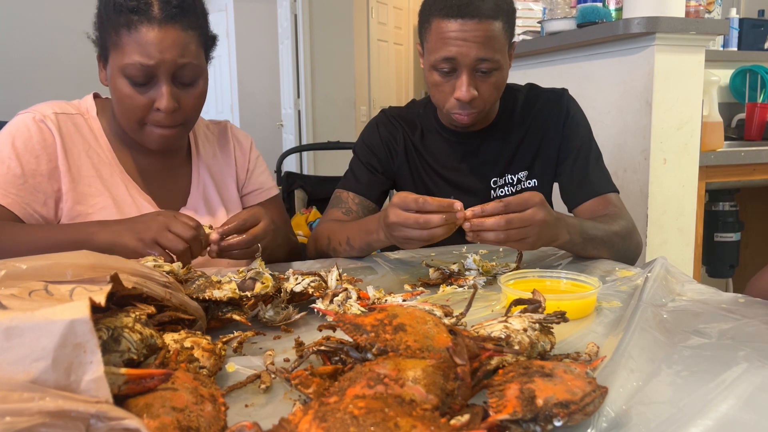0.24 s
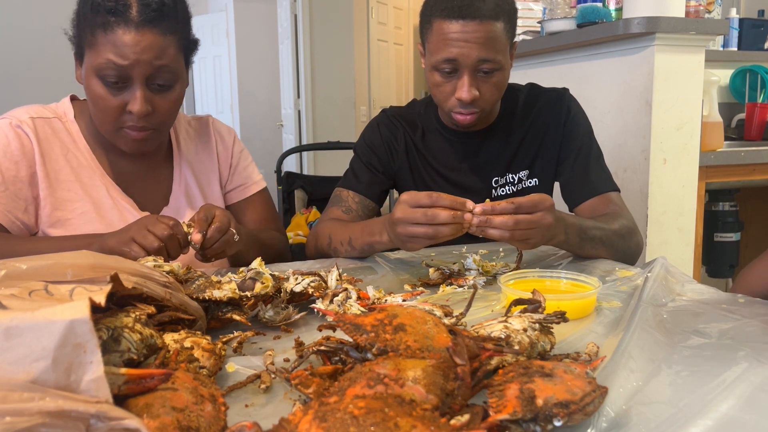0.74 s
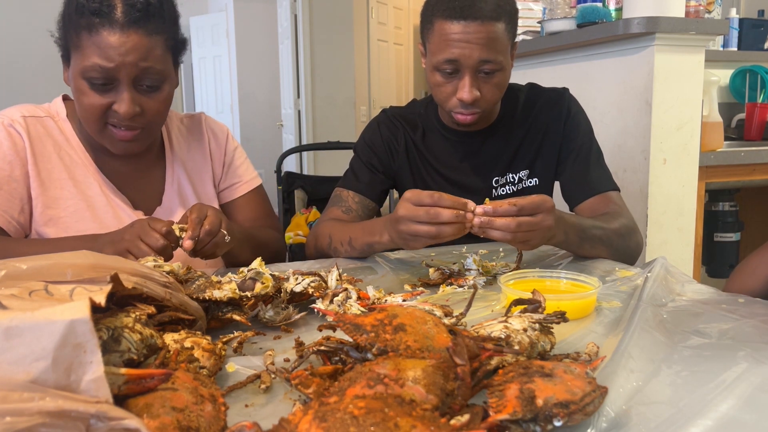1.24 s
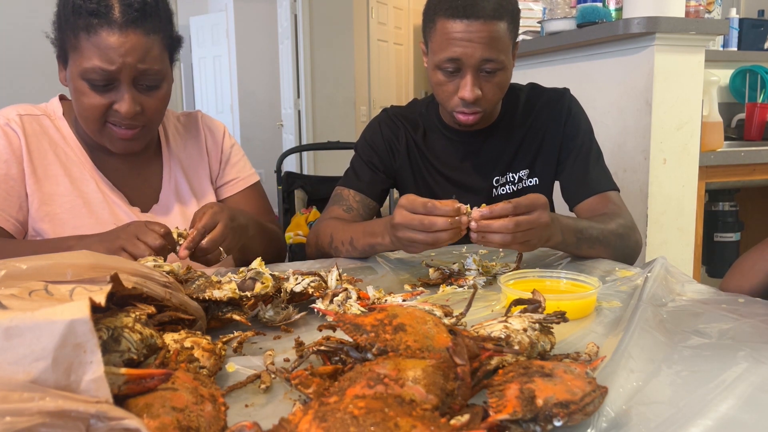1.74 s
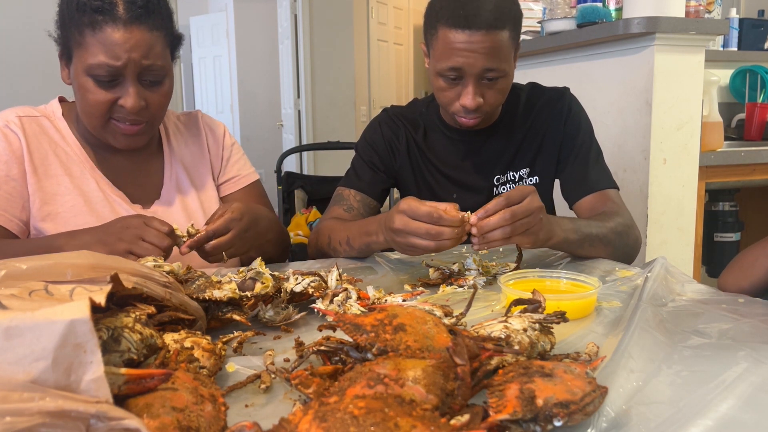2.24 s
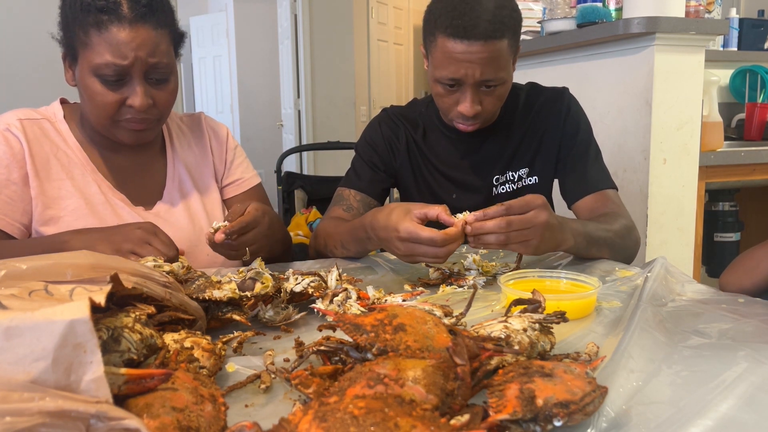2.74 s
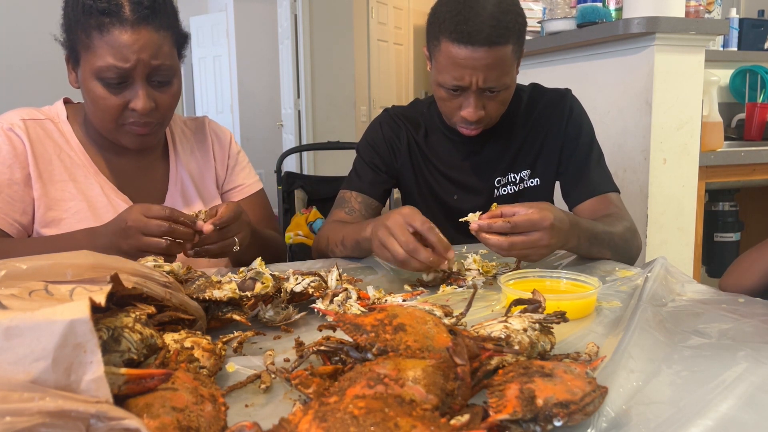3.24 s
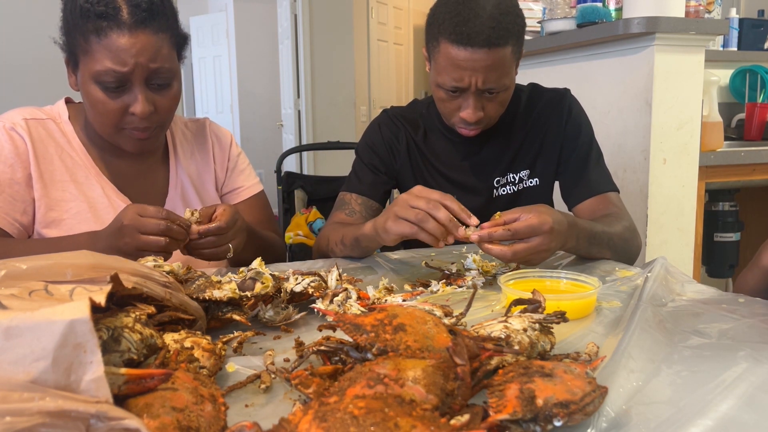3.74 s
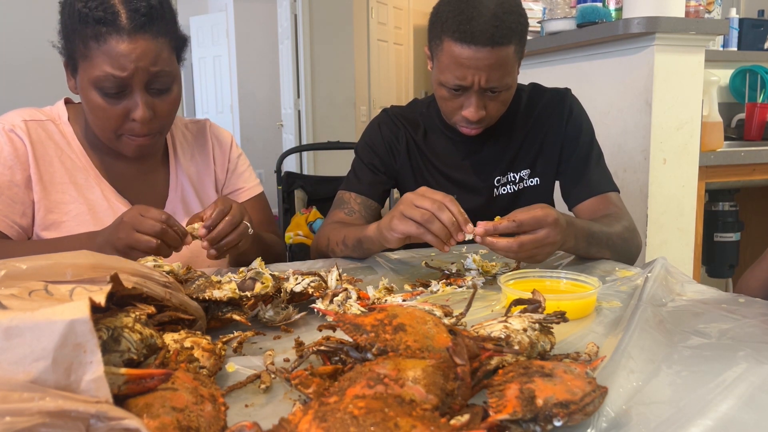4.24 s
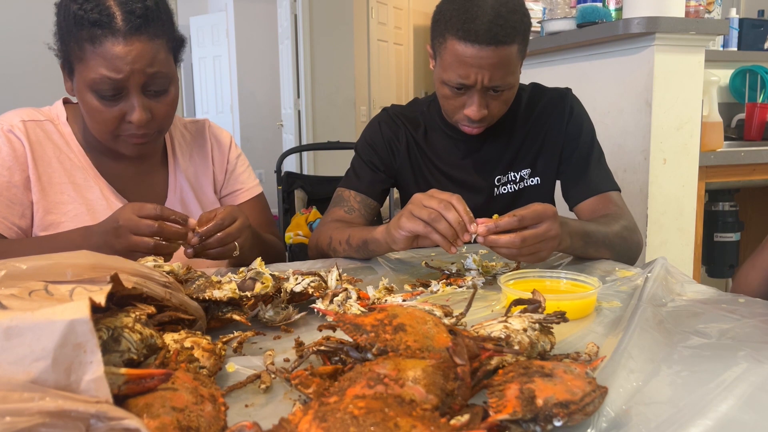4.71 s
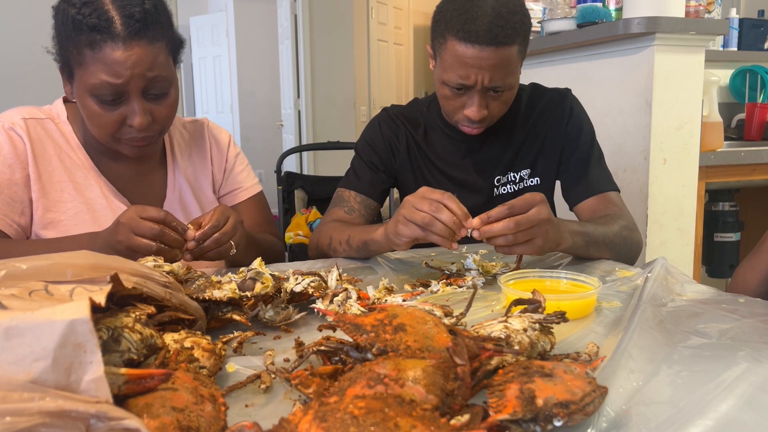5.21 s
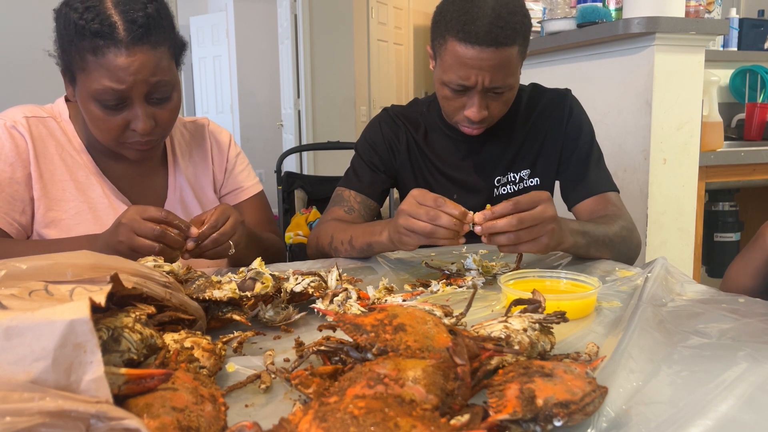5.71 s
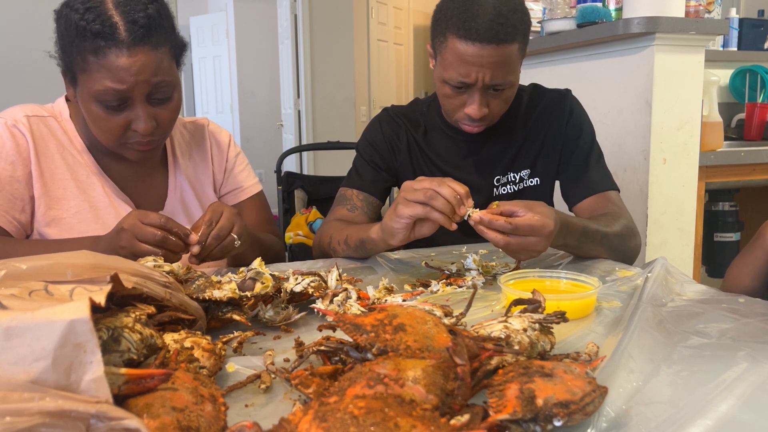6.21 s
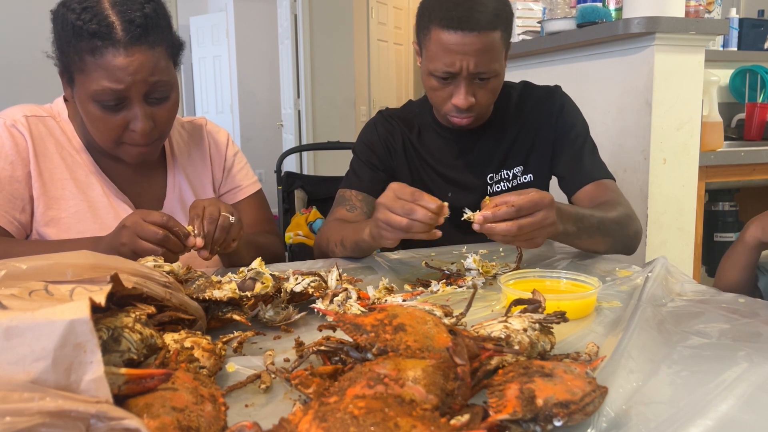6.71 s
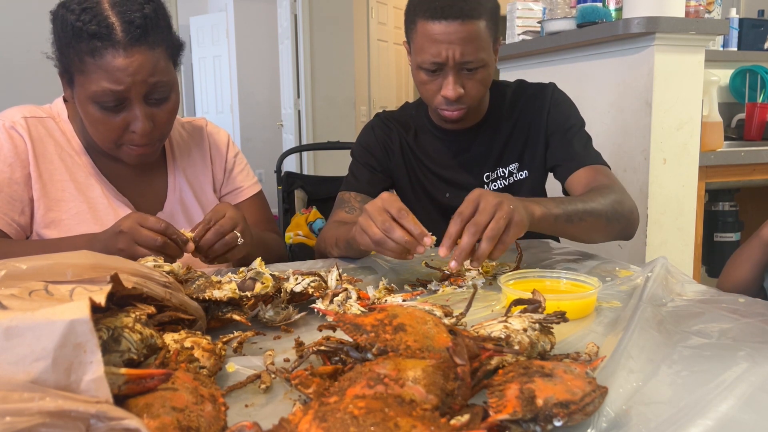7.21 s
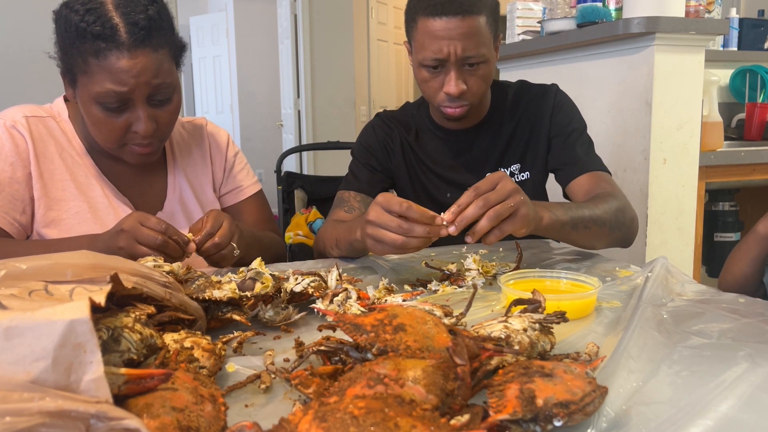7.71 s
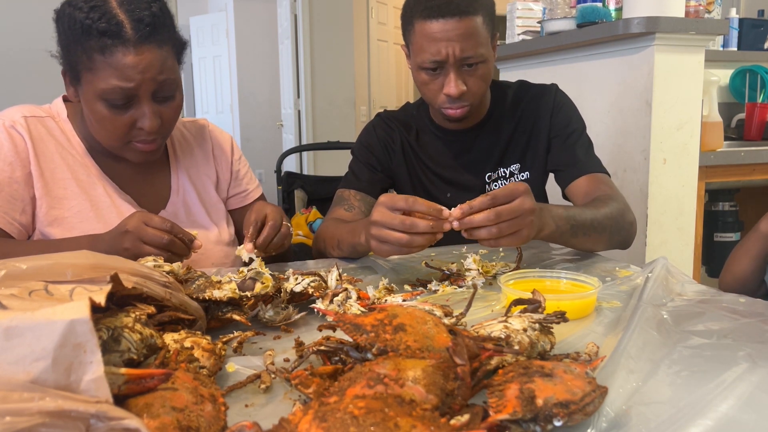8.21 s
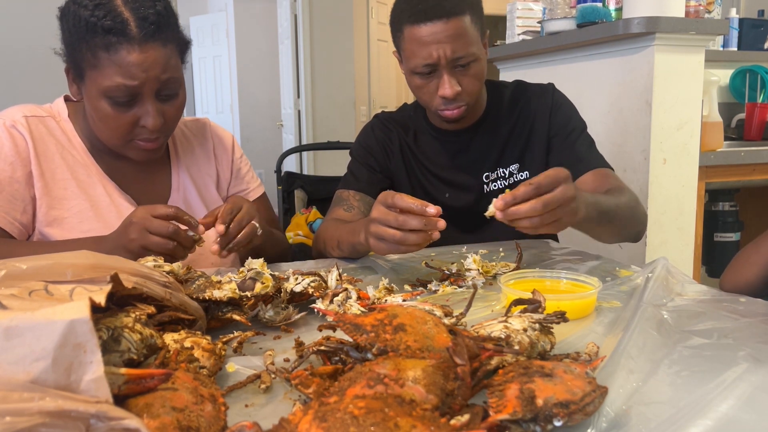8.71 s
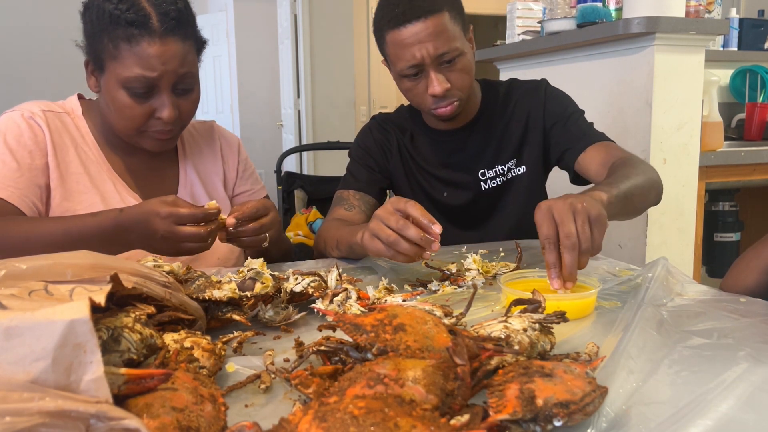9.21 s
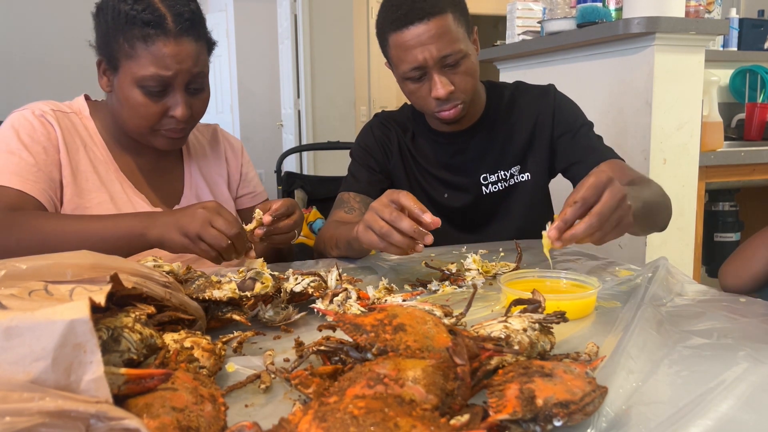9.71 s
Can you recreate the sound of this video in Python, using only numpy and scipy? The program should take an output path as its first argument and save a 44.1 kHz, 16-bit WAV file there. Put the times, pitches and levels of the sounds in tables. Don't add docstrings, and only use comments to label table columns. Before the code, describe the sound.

Crisp shell snaps and wet tearing fill the first seconds, then sparse tiny fingernail ticks and dropped scraps above a steady kitchen machine drone.

```python
import sys
import numpy as np
from scipy import signal
from scipy.fft import rfft, irfft, next_fast_len
from scipy.io import wavfile

SR = 44100
rng = np.random.default_rng(int(sys.argv[2]) if len(sys.argv) > 2 else 0)


def amplitude_ratio(level_db):
    exponent = np.asarray(level_db, float) / 20
    return 10 ** exponent


def pcm_store(signal):
    levels = np.round(np.clip(np.atleast_2d(signal), -1, 1) * 32767)
    wavfile.write(sys.argv[1], SR, levels.astype(np.int16).T)


N = 438794

# pitch_hz, left_lead_rad
LEAD = [(0, 0), (430, 0.7), (1030, -2.3), (1980, 7.0), (2410, 5.5), (4050, 5.9), (5250, 4.4), (6600, 3.0),
        (8270, 6.1), (9560, 6.3), (11800, 9.3), (13600, 9.4), (14700, 12.0), (16200, 12.9)]


def evened(x):
    return x / np.sqrt(np.mean(x ** 2) + 1e-20)


def read(points, hz):
    f, value = np.transpose(points)
    return np.interp(np.log(hz + 1), np.log(f + 1), value)


def add(mix, start_s, sound):
    part = mix[..., round(start_s * SR):][..., :sound.shape[-1]]
    part += sound[..., :part.shape[-1]]


def sides(pan_db):
    return amplitude_ratio(pan_db * np.array([[.5], [-.5]]))


def resonate(x, hz, width_hz):
    r = np.exp(-np.pi * width_hz / SR)
    return signal.lfilter([1, 0, -1], [1, -2 * r * np.cos(2 * np.pi * hz / SR), r * r], x)


def ring(hz, q, chance, t60_s):
    first_blow = 4.4
    fading = amplitude_ratio(-60 * np.arange(len(chance)) / SR / t60_s)
    x = np.r_[first_blow, chance[1:]] * fading
    for _ in range(2):
        x = resonate(x, hz, hz / q)
    return x / abs(x).max()


def splintering():
    t = np.arange(1800) / SR
    splinters_per_s = 710
    taps = (rng.random(len(t)) < splinters_per_s / SR) * rng.standard_normal(len(t))
    taps *= amplitude_ratio(-18 - 60 * t / 0.13)
    taps += rng.standard_normal(len(t)) * amplitude_ratio(-27.5 - 60 * t / 0.062)
    taps[0] = 1
    return taps


def snaps():
    # start_s, tick_db, ring_db, ring_hz
    claw = [(0.186, -64, -56.5, 2320), (0.2234, -89, -65, 2350), (0.317, -61, -55.5, 2400),
            (0.368, -70, -61, 2400), (0.4199, -32.5, -51.5, 3600), (.4384, -46, -57, 3400),
            (0.4456, -27.5, -56, 3270), (0.452, -48.5, -47, 5700), (0.4562, -38, -39.5, 5840),
            (0.5785, -62, -66, 2410), (.655, -63, -77, 4000), (.7542, -58, -64, 2320),
            (0.8757, -63, -49, 2680), (.892, -43, -48, 2800), (0.9055, -57, -53, 2560),
            (0.9219, -42, -52.5, 2750), (1.0414, -85, -62, 2800)]
    # start_s, tick_db, ring_db, ring_hz
    body = [(1.1386, -49, -44.5, 3300), (1.1493, -42.5, -49.5, 3450), (1.1777, -51, -45, 3500),
            (1.1993, -57, -46.5, 3750), (1.257, -47, -62, 2370), (1.273, -48, -55, 2340),
            (1.362, -53, -64, 4800), (1.3693, -36.5, -39, 2920), (1.495, -43, -48.5, 4700),
            (1.513, -41.5, -49, 3470), (1.553, -49.5, -53.5, 2530), (1.6026, -63, -47.5, 4450),
            (1.6368, -45, -49.5, 4400), (1.6531, -38.5, -71, 4170), (1.7036, -52, -53, 3980),
            (1.744, -47, -70, 4800), (1.7637, -29.5, -64, 3700), (1.7711, -39, -41, 5350),
            (1.7947, -41, -45.5, 2450), (1.802, -30.5, -43, 4250), (2.0877, -42.5, -63, 4500),
            (2.2225, -74, -65, 4800), (2.2772, -57, -73, 2430), (2.3155, -48.5, -71.5, 3780),
            (2.3564, -76, -61, 2950), (2.3715, -50, -66.5, 2780), (2.3988, -57, -60, 2560),
            (2.411, -55, -75, 2320), (2.4385, -52.5, -61.5, 2330), (2.727, -93, -58.5, 2420)]
    # start_s, tick_db, ring_db, ring_hz
    picks = [(3.2365, -67, -71, 3310), (3.3139, -73.5, -64, 3700), (3.7576, -66, -58, 5430),
             (3.7958, -71, -60.5, 2780), (3.9886, -50, -60, 2800), (4.0575, -89, -63, 3500),
             (4.562, -73, -68, 3280), (4.589, -63.5, -67.5, 2800), (5.5608, -52.5, -71, 3930),
             (5.7558, -63, -79, 3170), (6.0801, -79, -67.5, 3300), (6.2297, -68, -75, 2900),
             (6.4547, -56, -72, 2920), (6.5395, -64, -73, 2800), (6.617, -58, -77, 4150),
             (6.7441, -80, -58, 4280), (7.0094, -97, -59.5, 2870), (7.315, -65, -82, 3050),
             (7.4664, -51, -70, 3010), (7.5014, -62, -78, 2990), (8.0895, -67, -64, 3880),
             (8.2367, -89, -68, 3400), (9.03, -81, -66.5, 3300), (9.443, -76, -80.5, 2940)]
    # ring_pan_db, tick_pan_db; then tick_hz, tick_q (sharpness)
    parts = [
        (-4.5, -3.1, 6500, 4.2),
        (-3.5, 1, 6300, 0.83),
        (-5, -0.55, 6500, 3.4),
    ]
    break_s, lag_s = .004, .001
    out = np.zeros((2, N))
    for breaks, (pan_db, tick_pan_db, part_hz, tick_q) in zip((claw, body, picks), parts):
        for start_s, tick_db, ring_db, ring_hz in breaks:
            a, b, c = rng.standard_normal((3, 500))
            tick_hz = part_hz * (1 + 0.044 * np.tanh(a[0]))
            tick = amplitude_ratio(tick_db - 1.5) * ring(tick_hz, tick_q, a, break_s)
            snap = amplitude_ratio(ring_db + 7.0) * ring(ring_hz, 2, b, break_s)
            crack_db = 0.56 * tick_db + 0.52 * ring_db + 9
            snap += amplitude_ratio(crack_db) * ring(4100, 0.34, c, break_s)
            both = sides(pan_db) * snap + sides(tick_pan_db) * tick
            add(out, start_s + lag_s, signal.fftconvolve(both, splintering()[None], axes=1))
    return out


def pulling():
    # peak_s, level_db, build_s, release_s
    pulls = [(.192, -63.5, 0.025, 0.09), (.312, -62.5, .015, 0.21), (0.423, -51, .004, 0.044),
             (.452, -62, 0.021, .05), (.604, -72.5, .02, .3), (.756, -82, .05, .11), (.96, -64, .05, 0.21),
             (1.55, -68, .01, .1), (1.663, -57, 0.06, .02), (1.754, -60, 0.23, .03), (2.1, -69, .01, .13),
             (2.319, -59.5, 0.01, 0.065), (2.38, -70, .05, .25), (3.24, -61.5, .014, .04),
             (4.6, -86, .1, 0.24), (6.682, -71.5, .11, .06), (6.79, -72, .1, .25), (6.994, -83, .06, 0.19),
             (7.67, -75, 0.14, 0.17), (8.98, -70, .03, 0.042), (9.03, -64.5, 0.13, 0.11)]
    t, level = np.arange(N) / SR, np.zeros(N)
    for s, db, build, release in pulls:
        near = slice(max(round((s - 2 * build) * SR), 0), round((s + 2 * release) * SR))
        late = t[near] - s
        away = np.where(late < 0, -late / build, late / release)
        level[near] += amplitude_ratio(db - 30 * away)
    return level


def tearing():
    # pitch_hz, level_db (per Hz)
    tear = [(1000, -9.5), (2500, -5.5), (4000, 0.5), (5500, 5.5), (7500, 0.5), (10000, -14), (13000, -25.5),
            (16500, -26)]
    ticks_per_s = 600
    ticks = amplitude_ratio(3.5 * np.minimum(rng.exponential(1, N), 5)) * (rng.random(N) < ticks_per_s / SR)
    grain = evened(ticks * rng.choice([-1, 1], N)) + 0.86 * rng.standard_normal(N)
    hz = np.linspace(0, SR / 2, 129)
    response = amplitude_ratio(2 * read(tear, hz)) * (hz < hz[-1])
    colour = signal.minimum_phase(signal.firwin2(255, hz, response, fs=SR))
    return amplitude_ratio([[-5.0], [-3.5]]) * pulling() * evened(signal.oaconvolve(grain, colour)[:N])


def drops():
    # start_s, thud_db, thud_hz, slap_db, slap_hz
    falls = [
        (0.457, -44.5, 626, -41, 1510),
        (1.37, -64, 606, -41.5, 1530),
        (2.409, -64, 600, -49, 1210),
        (2.729, -45.5, 527, -47.5, 1490),
        (3.342, -45.5, 576, -49, 1330),
        (3.369, -64.5, 510, -49, 1120),
        (6.456, -53, 493, -51, 1360),
        (7.009, -58, 511, -51.5, 1106),
        (9.899, -50.5, 596, -85, 1270),
    ]
    out = np.zeros((2, N))
    for start_s, thud_db, thud_hz, slap_db, slap_hz in falls:
        a, b = rng.standard_normal((2, 1500))
        thud = amplitude_ratio(thud_db) * ring(thud_hz, 1.6, a, .015)
        slap = amplitude_ratio(slap_db + 1.5) * ring(slap_hz, 1.0, b, 0.029)
        add(out, start_s - .001, thud + slap)
    return out


def scuff():
    # level_db, pitch_hz, t60_s
    db, hz, t60_s = (-59.5, 1900, 0.32)
    out = np.zeros((2, N))
    add(out, 7.645, amplitude_ratio(db) * ring(hz, 3.1, rng.standard_normal(4000), t60_s))
    return out


def room(x):
    # pitch_hz, t60_s
    decay = [(700, 0.97), (1500, 0.68), (4000, 0.44), (10000, 0.27), (13000, 0.059)]
    # delay_s, level_db
    echoes = [(.0043, -17), (.008, -7), (.0131, -16), (.0158, -12)]
    size = SR // 2
    taps = np.zeros((2, size))
    at = np.arange(300, size - 20, 20) + rng.integers(0, 20, (2, (size - 301) // 20))
    np.put_along_axis(taps, at, rng.choice([-1., 1.], at.shape), 1)
    shared = 0.64 * taps + taps[0]
    hz, t, z = signal.stft(shared, SR, nperseg=256)
    tail = signal.istft(z * amplitude_ratio(-60 * t / read(decay, hz)[:, None]), SR, nperseg=256)[1]
    tail *= amplitude_ratio(-8.0) / np.linalg.norm(tail[0])
    tail[:, 0] += 1
    for s, db in echoes:
        tail[:, round(s * SR)] += amplitude_ratio(db)
    return signal.fftconvolve(x, tail, axes=1)[:, :N]


def ports(x):
    # pitch_hz, level_db
    mic = [(200, 9.5), (10300, -0.5), (11600, 0.5), (12400, -10), (13600, -5.5), (15300, -5.5),
           (16200, -15)]
    size = next_fast_len(N)
    hz = np.fft.rfftfreq(size, 1 / SR)
    turn = np.array([np.ones(len(hz)), np.exp(-1j * read(LEAD, hz))])
    return irfft(rfft(x, size) * turn * amplitude_ratio(read(mic, hz)), size)[:, :N]


def tone(turns, db, tilt_db, lead):
    return np.sqrt(2) * amplitude_ratio(db) * np.array([np.cos(turns + lead), amplitude_ratio(-tilt_db) * np.cos(turns)])


def motors():
    multiples = [1, 2, 3, 4, 7, 15, 17, 19, 21, 22, 23, 24, 26, 28, 30, 49, 52, 58, 60, 62]
    # left_rms_db, left_minus_right_db, left_lead_rad
    orders = [(-43, -.5, 0.3), (-61.5, -3, 1), (-62, 4, 2.3), (-54.5, 4, -6.5), (-61.5, 3.5, 1.85),
              (-66.5, 19.5, -0.36), (-78.5, -4, 2), (-81.5, -3.5, -2.5), (-72.5, 4.5, 0), (-86, -4.5, 2.5),
              (-88.5, -0.5, 4.5), (-86.5, 3.5, 3), (-88.5, -2, -2.5), (-86, -3, 2.5), (-83.5, -3.5, -3),
              (-101, -1.5, -3), (-101, -1.5, -3), (-101, -2.5, -3.5), (-99, 0, 4), (-101, -5, -1.5)]
    # pitch_hz, meet_s (their crest meets the compressor's)
    rivals = [(59.30, .232), (58.52, .965)]
    rivals_db = [-52.5, -53.5]
    compressor_hz = 58.196
    t = np.arange(N) / SR
    out = sum(tone(2 * np.pi * k * compressor_hz * t + k * k, *order) for k, order in zip(multiples, orders))
    for (hz, meet_s), db in zip(rivals, rivals_db):
        turns = compressor_hz * t + (hz - compressor_hz) * (t - meet_s)
        out += tone(2 * np.pi * turns + 1, db, -.4, .15)
    return out


def hum():
    hum_hz = [104.40, 111.66, 120.04, 223.33, 240.06, 1097.9, 9362, 9842]
    # left_rms_db, left_minus_right_db, left_lead_rad
    levels = [(-56, 1.5, -0.19), (-56, 3, 0.65), (-59.5, -1.5, 0.13), (-53, 5, 1), (-40, 6.5, 0.09),
              (-71, 5.5, -2.2), (-113, 0, 0), (-114, 2.5, 0)]
    t = np.arange(N) / SR
    return sum(tone(2 * np.pi * (hz * t + rng.random()), *row) for hz, row in zip(hum_hz, levels))


def pipe():
    # time_s, pitch_hz, level_db
    s, hz, db = np.transpose([(0, 398, -54), (.5, 400, -61.5), (0.999, 409.4, -59), (2, 419, -75.5),
                              (2.6, 424, -94)])
    t = np.arange(N) / SR
    filling = 2 * np.pi * np.cumsum(np.interp(t, s, hz)) / SR
    return tone(filling, np.interp(t, s, db), 2.1, 0.85) * (t < s[-1])


def air():
    # pitch_hz, level_db (per Hz)
    spectrum = [(20, -86), (60, -73.5), (90, -78.5), (200, -72.5), (350, -81), (600, -88), (1100, -91),
                (1800, -94.5), (2400, -105), (3400, -110), (4700, -117), (6800, -124), (11400, -135),
                (12000, -146)]
    # pitch_hz, width_hz, lift_db
    lumps = [(37.2, 6.7, 16.5), (75.5, 22, 3), (114.3, 16, 3), (149, 18, 2.5), (164.5, 20, 0.5),
             (245.4, 11, 2.5), (265.9, 6.7, 11.5), (310, 50, -3.5), (446.7, 30, 6), (509, 23, -1.5),
             (810, 44, -5.5), (7400, 150, -12)]
    # pitch_hz, likeness (0-1)
    likeness = [(90, 1), (260, 0.88), (430, 0.87), (900, 0.17), (1500, 0.03), (2100, 0.1), (2600, 0.42),
                (4300, 0.25), (5100, 0.18), (5700, 0.43), (7300, 1), (9300, 0.82), (11000, .4)]
    # pitch_hz, left_minus_right_db
    tilt = [(60, 2), (110, -0.5), (200, 6.5), (380, 3.5), (700, 4.5), (1290, -1.5), (2380, -3), (4400, -5),
            (8120, 10), (15000, 13)]
    size = next_fast_len(N)
    hz = np.fft.rfftfreq(size, 1 / SR)
    left, own = rfft(rng.standard_normal((2, size)))
    lift = 1 + sum(amplitude_ratio(db) / (1 + (2 * (hz - f) / w) ** 2) for f, w, db in lumps)
    same = np.clip(read(likeness, hz), 0, 1)
    right = same * left * np.exp(-1j * read(LEAD, hz)) + np.sqrt(1 - same ** 2) * own
    right = right * amplitude_ratio(-read(tilt, hz))
    colour = lift * amplitude_ratio(read(spectrum, hz)) * np.sqrt(SR / 2)
    return irfft(np.array([left, right]) * colour, size)[:, :N]


def whine():
    # pitch_hz, width_hz, rms_db, throb_depth (0-1)
    hz, width_hz, db, depth = (4557.5, 114, -74.5, 0.4)
    t = np.arange(N) / SR
    drive = rng.standard_normal(N) * (1 + depth * np.cos(2 * np.pi * 60.015 * t))
    return amplitude_ratio([[db - 27.5], [db]]) * evened(resonate(drive, hz, width_hz))


def scene():
    hands = snaps() + drops() + scuff() + tearing()
    machines = motors() + hum() + pipe()
    return ports(room(hands)) + machines + air() + whine()


def band_limit(x):
    return signal.sosfilt(signal.butter(12, 16620, fs=SR, output="sos"), x)


def record(dry):
    fade = np.minimum(np.arange(N)[::-1] / 90, 1)
    return band_limit(dry * fade)


dry = scene()
out = record(dry)
pcm_store(out)
```